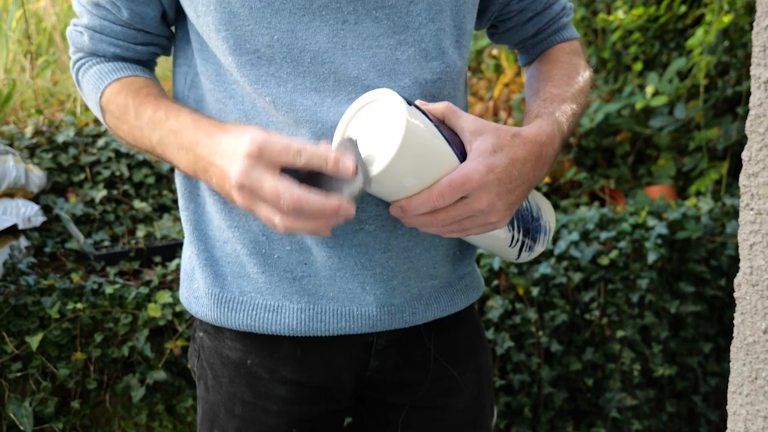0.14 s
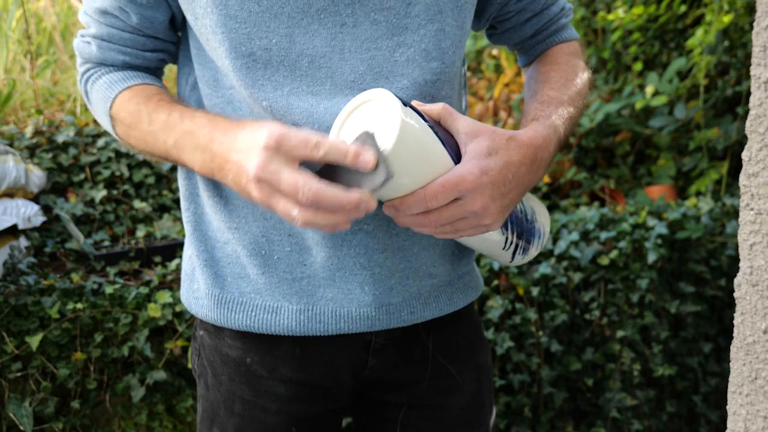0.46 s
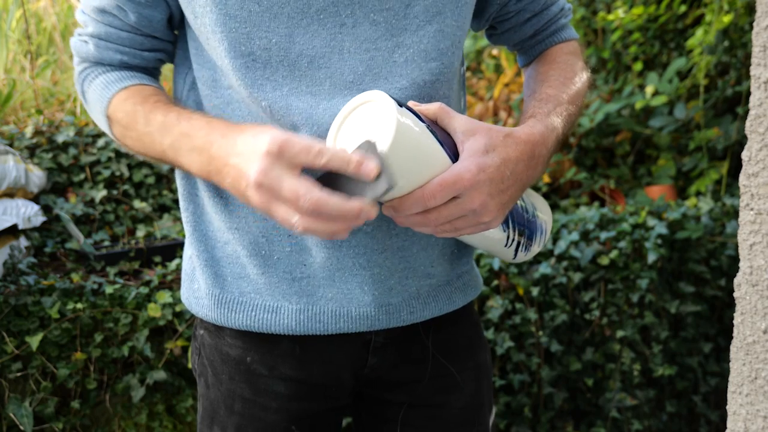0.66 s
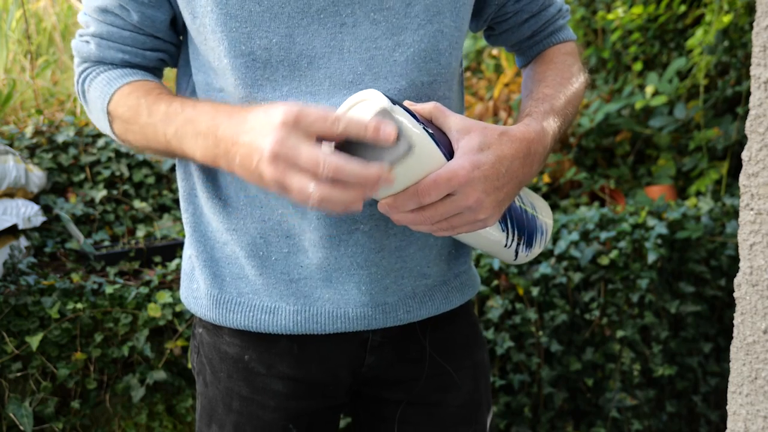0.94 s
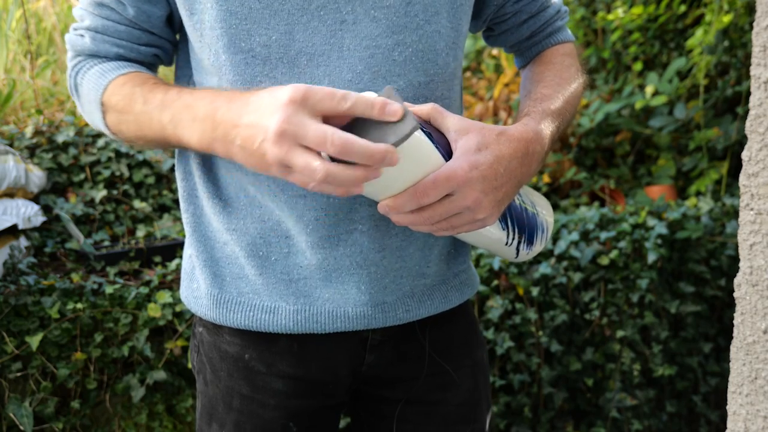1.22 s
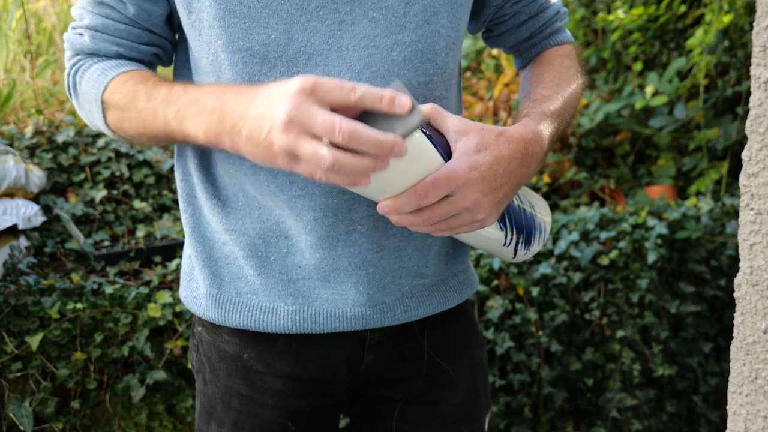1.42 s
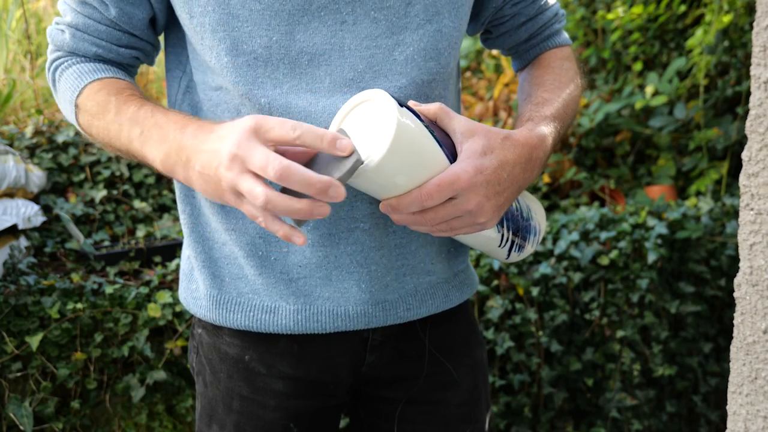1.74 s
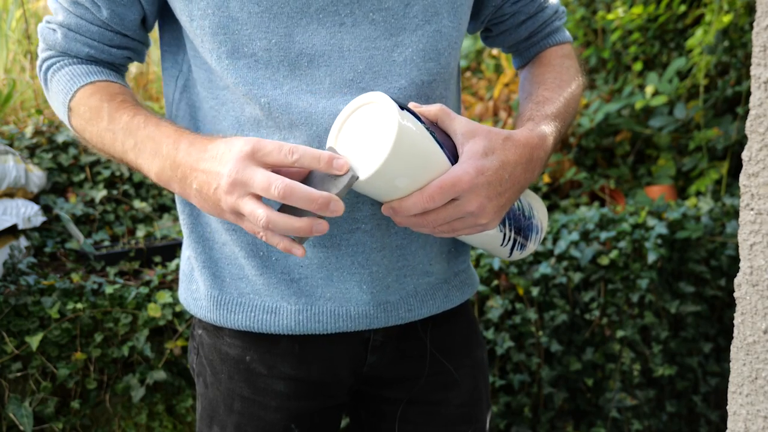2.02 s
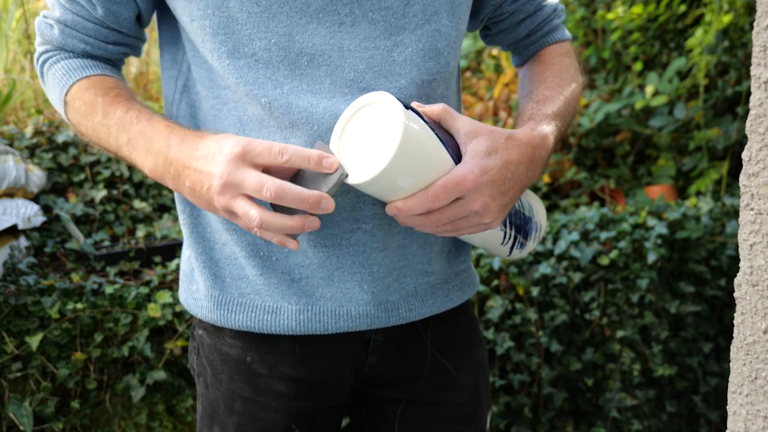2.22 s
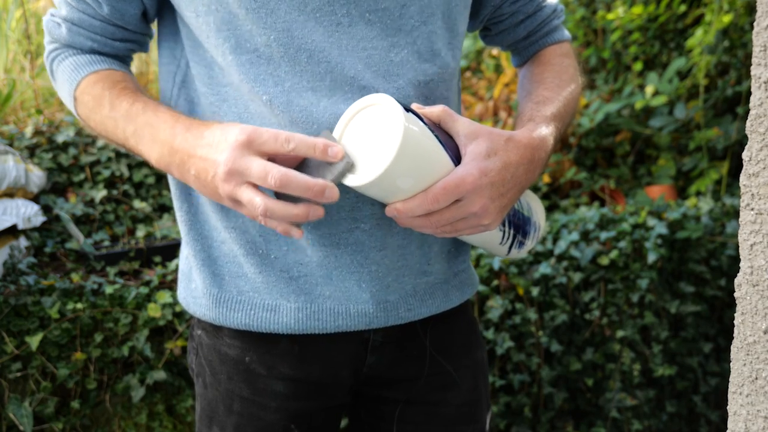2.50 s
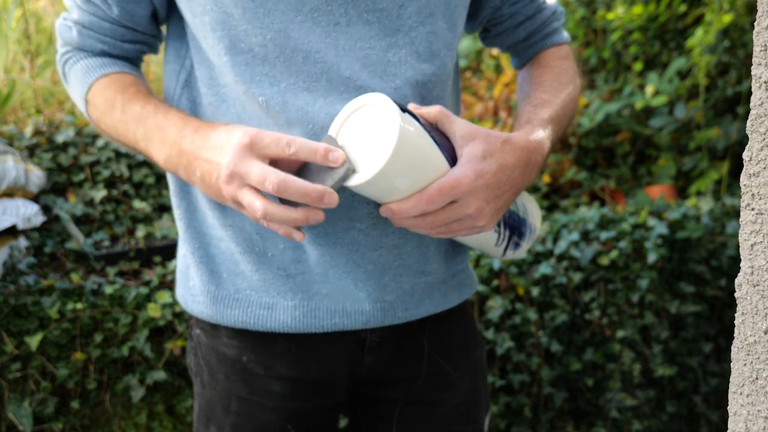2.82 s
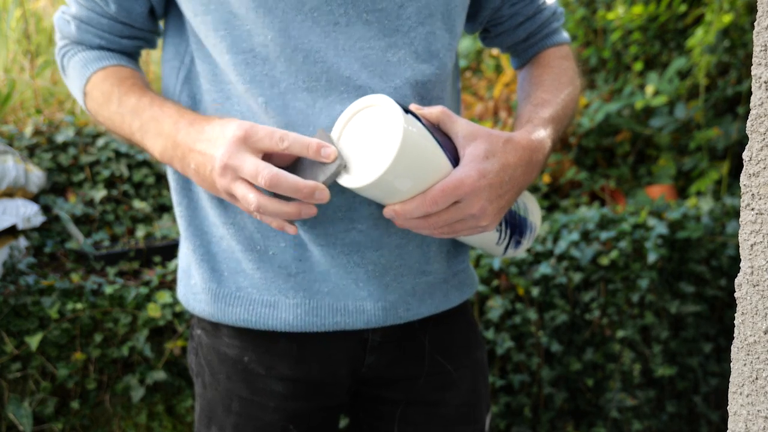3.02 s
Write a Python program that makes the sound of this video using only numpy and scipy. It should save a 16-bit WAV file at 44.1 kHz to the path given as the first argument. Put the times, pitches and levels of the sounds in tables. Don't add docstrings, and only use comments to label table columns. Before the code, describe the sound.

A sanding pad rubs a ceramic vase base in quick dry strokes, stops briefly, lands with a small tick, then scrapes the rim louder and sharper; close microphone outdoors, short wall echo, faint distant traffic.

```python
import sys
import numpy as np
from scipy import signal
from scipy.fft import rfft, irfft, next_fast_len
from scipy.io import wavfile
from scipy.ndimage import uniform_filter1d, map_coordinates

SR = 44100
rng = np.random.default_rng(int(sys.argv[2]) if len(sys.argv) > 2 else 0)


def wav_record(signal):
    frames = np.transpose(np.atleast_2d(signal))
    bounded = np.clip(frames, -1, 1)
    quanta = np.round(bounded * 32767).astype(np.int16)
    wavfile.write(sys.argv[1], SR, quanta)


def attenuation_scalar(level_db):
    decades = np.asarray(level_db, float) / 20
    return 10 ** decades


N = 138915

# [start_s, pressure_db, vase_over_grit_db, fine_dust_db, turn_round_dip_db]
FACE_STROKES = [(-0.06, -45, 2, -0.7, -24), (0.05, -43, -3, -4.7, -4), (0.161, -42.5, -3.5, -4.5, -5),
                (0.266, -43, -4, -6, -3.5), (0.38, -44.5, -0.2, -1.5, -3), (0.493, -44, 0.2, -1.5, -6),
                (0.615, -46.5, 0.5, 0, 0.5), (0.725, -42, -1.5, -1.5, -9.5), (0.857, -46, -2, -2, 8),
                (0.958, -42.5, -1.5, 0, -8), (1.079, -45, -2.1, -4, 1), (1.185, -42, -7.5, -2.7, -6.5),
                (1.316, -46, -1, 0.5, 22), (1.416, -41.5, -7.5, -2.5, -6.5), (1.544, -46.5, -2, 0, 4.5)]
RIM_STROKES = [
    (1.957, -42.5, -10, 5, -34),
    (2.105, -45, -13, 7, -12),
    (2.21, -38, -8, 6.3, -35),
    (2.337, -40.5, -7.5, 2.5, -10),
    (2.454, -36, -9.5, -1, -14.5),
    (2.581, -36, -12, -2, -13),
    (2.694, -35.7, -8.5, -1.5, -7),
    (2.818, -41.5, -12, 3.5, -9.5),
    (2.915, -34.5, -11, -4.5, -24),
    (3.047, -43, -10, 1.5, 1.5),
]
# [end_s, level_db]
FACE_END = (1.607, -59)
RIM_END = (3.19, -46)
# [stroke_skew, roundness, scrub_db, scrub_speed_exponent, dust_db,
# dust_speed_exponent, vase_speed_exponent], the exponents and shapes without unit
FACE_GRIP = (1.43, 1.02, -5, 0.48, -1.5, 1.3, 1.5)
RIM_GRIP = (1.01, 1.3, -2.5, 0.52, -10, 1.5, 0.32)
FACE_STALL, RIM_STALL = 0.1, 0.42
STALL_S = 0.008

FACE_GRIT = [(5637, 1280, -3.5), (6580, 1370, 0.5), (7640, 1230, -1), (8910, 1180, -6)]
RIM_GRIT = [(5100, 610, -4), (6140, 940, -0.5), (7050, 950, 0.5), (8820, 3100, -7)]
FACE_SCRUB = [(3240, 2970, -4.5), (5220, 2700, -2.84)]
RIM_SCRUB = [(3334, 910, -4.6), (3920, 315, 1), (4660, 1250, -4.43)]
FACE_VASE = [(476, 356, -13), (782, 154, -7), (920, 104, -4.5), (1305, 310, 0.5), (1408, 240, 2),
             (1840, 440, -4.5)]
RIM_VASE = [(395, 133, -4.5), (820, 580, -5.5), (1110, 126, 2), (1730, 910, -1.5)]
FACE_FOOT = [(2163, 477, 0), (2620, 650, 0.5), (3385, 620, -3.5)]
RIM_FOOT = [(2097, 610, 0.88), (2770, 1000, -2.2)]
DUST = [(8940, 4400, -1), (13560, 2300, 0), (16000, 2200, -1.5)]
HANDS = [(53.6, 6.8, 5.5), (132, 120, -5.5), (238, 160, -2), (431, 40, -0.5)]
TOUCH = [(850, 540, 6.5), (2200, 1500, 2.5), (4230, 1700, -2.5), (9000, 5300, -15)]
SLIDE = [(1500, 1460, -6), (3170, 930, 1), (6500, 3400, -11)]

GRAINS_PER_S, GRAIN_SPREAD_DB, BIGGEST_DB = 9000, 2.5, 8.5
CLUMP_DB, PATCHY_DB = -2.35, 1.5
FOOT_LAG_S, FOOT_DB, HANDS_DB = 0.022, 0, -67.5
TOUCH_S, TOUCH_DB = 1.925, -34
SLIDE_S, SLIDE_DB = 0.033, -56

# [frequency_hz, decay_60db_s]
YARD_DECAY = [(500, .2), (3000, .42), (6000, .42), (9000, .3), (14000, .2)]
YARD_DB, YARD_DELAY_S = -15, 0.012
# [frequency_hz, level_db]
TRAFFIC = [(22, -39), (40, -3.5), (70, -2), (110, -7), (235, -7), (500, -8), (1050, -3), (1700, -11.5)]
HISS = [(1500, -12), (3000, -2), (7000, 0), (11000, -2), (15500, -4)]
TRAFFIC_DB, SWELL_DB, TRAFFIC_SIDE_DB, HISS_DB = -63.5, 1, -27.5, -75

# [start_s, length_s]
PARTS = [(0.114, 0.077), (0.319, 0.016), (0.445, 0.033), (0.493, 0.025), (0.764, 0.05), (0.852, 0.067),
         (0.943, 0.04), (1.025, 0.036), (1.092, 0.052), (1.19, 0.14), (1.514, 0.022), (2.204, .04),
         (2.287, 0.044), (2.39, 0.038), (2.534, 0.031), (2.668, 0.03), (2.731, 0.013), (2.8, 0.018),
         (3.008, 0.025), (3.118, 0.019)]
# [frequency_hz, level_db]
PART_COLOUR = [(60, 2.5), (400, 3), (1300, 0), (5000, -0.5), (9000, 1), (15000, 10)]
PART_DB, JOINED_DB, FLICKER_DB = -17, -26, 4
TOP_HZ, FADE_HZ = 15700, 16200


def unit(x):
    return x / np.sqrt(np.mean(x ** 2) + 1e-20)


def along(points, hz):
    f, value = np.transpose(points)
    return np.interp(np.log(hz + 1), np.log(f + 1), value)


def wobble(rate):
    knots = rng.standard_normal(int(N * rate / SR) + 4)
    return map_coordinates(knots, [np.arange(N) * rate / SR])


def filtered(x, response):
    m = next_fast_len(N + SR // 2)
    return irfft(rfft(x, m) * response(np.fft.rfftfreq(m, 1 / SR)), m)[..., :N]


def resonant(x, peaks, order=1):
    def body(f):
        total = 0
        for k, (centre, width, db) in enumerate(peaks):
            mode = 1j * f * width / (centre * centre - f * f + 1j * f * width)
            total = total + (-1) ** k * attenuation_scalar(db) * mode
        return total
    return filtered(x, lambda f: body(f) ** order)


def grains(peaks, order=1):
    draw = rng.random((3, N))
    size_db = np.minimum(-GRAIN_SPREAD_DB * np.log(1 - draw[1]), BIGGEST_DB)
    size = attenuation_scalar(size_db + CLUMP_DB * wobble(120))
    scratches = (draw[0] < GRAINS_PER_S / SR) * size * np.sign(draw[2] - 0.5)
    z = signal.stft(scratches, nperseg=256)[2]
    field = uniform_filter1d(rng.standard_normal(z.shape), 5, 0)
    field = uniform_filter1d(field, 12, 1)
    patched = signal.istft(z * attenuation_scalar(PATCHY_DB * unit(field)), nperseg=256)[1][:N]
    return unit(resonant(patched, peaks, order))


def rub(strokes, end, grip, grit, scrub, vase, foot, stall_share):
    skew, roundness, scrub_db, scrub_follows, dust_db, dust_follows, vase_follows = grip
    start, press_db, vase_db, fine_db, dip_db = np.transpose(strokes)
    end_s, end_db = end
    edges = np.append(start, end_s)
    middle = (edges[1:] + edges[:-1]) / 2
    t = np.arange(N) / SR

    place = np.interp(t, edges, np.arange(len(edges)))
    k = np.minimum(place.astype(int), len(start) - 1)
    arch = np.abs(np.sin(np.pi * (place - k) ** skew)) ** roundness

    dip_db = np.minimum(dip_db, 0)
    turn_db = np.append(press_db + (1 - stall_share) * dip_db, end_db)
    turn = attenuation_scalar(np.interp(t, edges, turn_db))
    stall = attenuation_scalar(stall_share * dip_db @ np.exp(-((t - start[:, None]) / STALL_S) ** 2))
    mean = attenuation_scalar(press_db.mean())
    speed = (turn + (attenuation_scalar(press_db[k]) - turn) * arch) * stall / mean

    shake = attenuation_scalar(np.interp(t, middle, vase_db)) * speed ** vase_follows
    late_shake = np.interp(t - FOOT_LAG_S, t, shake)
    dust_level = attenuation_scalar(dust_db + np.interp(t, middle, fine_db)) * speed ** dust_follows
    layers = speed * grains(grit, order=2)
    layers += attenuation_scalar(scrub_db) * speed ** scrub_follows * grains(scrub, order=2)
    layers += attenuation_scalar(-1.5) * shake * grains(vase)
    layers += attenuation_scalar(FOOT_DB - 1) * late_shake * grains(foot, order=2)
    layers += dust_level * grains(DUST, order=2)
    touching = uniform_filter1d(1.0 * ((t > edges[0]) & (t < edges[-1])), size=400)
    return touching * (mean * layers + attenuation_scalar(HANDS_DB) * grains(HANDS))


def touch():
    t = np.arange(N) / SR - TOUCH_S
    impulse = 1.0 * (np.arange(N) == round(TOUCH_S * SR))
    tick = resonant(impulse, TOUCH)
    slide = np.sin(np.pi * np.clip(t / SLIDE_S, 0, 1)) ** 0.65 * grains(SLIDE)
    return attenuation_scalar(TOUCH_DB) * tick / np.abs(tick).max() + attenuation_scalar(SLIDE_DB) * slide


def yard(x):
    hz, t, z = signal.stft(rng.standard_normal(SR // 2), SR, nperseg=256)
    decay = attenuation_scalar(-60 * t / along(YARD_DECAY, hz)[:, None])
    tail = signal.istft(z * decay, SR, nperseg=256)[1]
    delayed = np.pad(x, (round(YARD_DELAY_S * SR), 0))
    return attenuation_scalar(YARD_DB) * signal.fftconvolve(delayed, tail / np.linalg.norm(tail))[:N]


def traffic():
    def rumble(hz):
        return attenuation_scalar(along(TRAFFIC, hz)) / (1 + (hz / 2000) ** 1.77)
    mid, side = filtered(rng.standard_normal((2, N)), rumble)
    mid = unit(mid) * attenuation_scalar(SWELL_DB * wobble(3.33))
    side = unit(side) * attenuation_scalar(TRAFFIC_SIDE_DB)
    hiss_points = [(300, -40)] + HISS
    hiss = unit(filtered(rng.standard_normal((2, N)), lambda hz: attenuation_scalar(along(hiss_points, hz))))
    return attenuation_scalar(TRAFFIC_DB) * np.array([mid + side, mid - side]) + attenuation_scalar(HISS_DB) * hiss


def parting(x):
    t = np.arange(N) / SR
    z = signal.stft(x.mean(0), nperseg=1024)[2]
    random_phase = np.exp(2j * np.pi * rng.random(z.shape))
    ghost = signal.istft(z * random_phase, nperseg=1024)[1][:N]
    bursts = sum(1.0 * ((t > s) & (t < s + length)) for s, length in PARTS)
    parted = uniform_filter1d(bursts, size=500)
    level = attenuation_scalar(JOINED_DB + FLICKER_DB * wobble(20)) + attenuation_scalar(PART_DB) * parted
    side = filtered(ghost, lambda hz: attenuation_scalar(along(PART_COLOUR, hz))) * level
    return x + np.array([side, -side])


def scene():
    face = rub(FACE_STROKES, FACE_END, FACE_GRIP, FACE_GRIT, FACE_SCRUB, FACE_VASE, FACE_FOOT, FACE_STALL)
    rim = rub(RIM_STROKES, RIM_END, RIM_GRIP, RIM_GRIT, RIM_SCRUB, RIM_VASE, RIM_FOOT, RIM_STALL)
    near = face + touch() + rim
    return near + yard(near) + traffic()


def roll_off(x):
    return signal.sosfilt(signal.butter(12, 15640, fs=SR, output="sos"), x)


def record(dry):
    def band(hz):
        return (hz < TOP_HZ) / (1 + (hz / FADE_HZ) ** 20)
    mix = filtered(parting(dry), band)
    return roll_off(mix)


dry = scene()
out = record(dry)
wav_record(out)
```